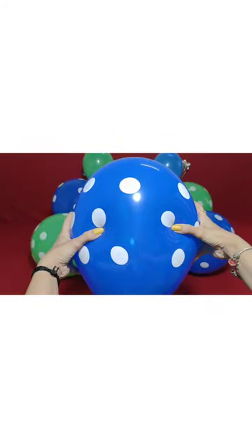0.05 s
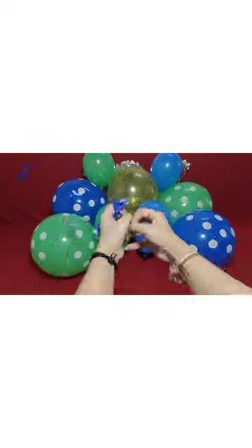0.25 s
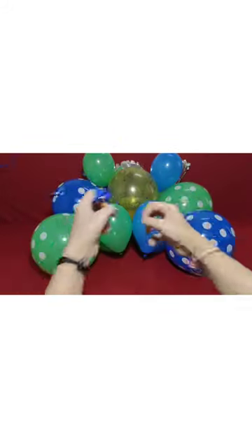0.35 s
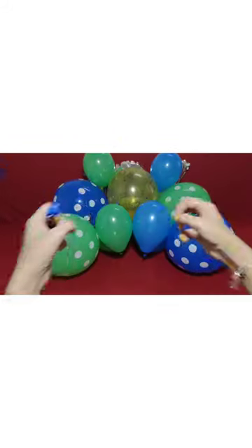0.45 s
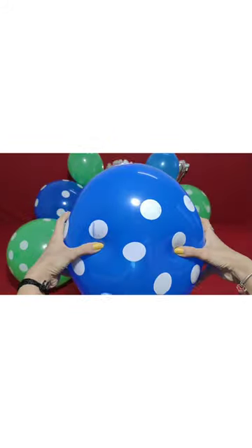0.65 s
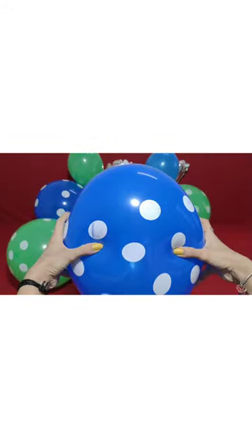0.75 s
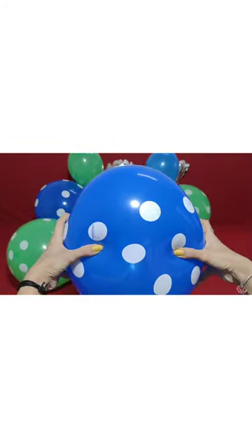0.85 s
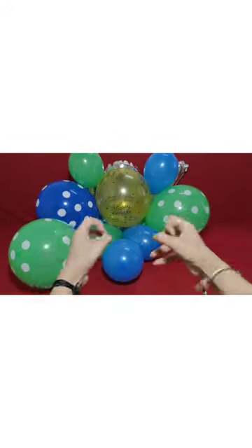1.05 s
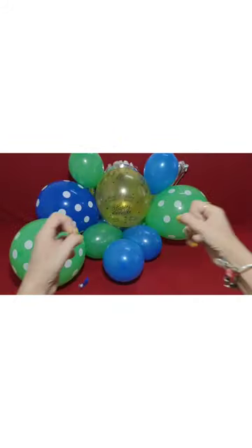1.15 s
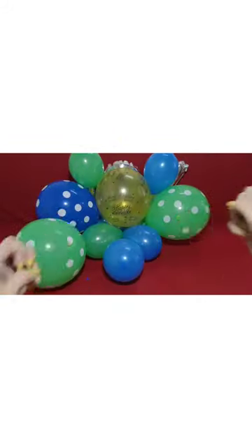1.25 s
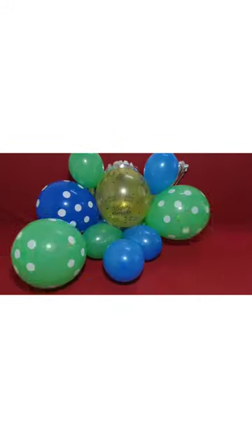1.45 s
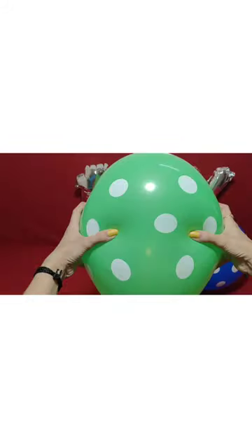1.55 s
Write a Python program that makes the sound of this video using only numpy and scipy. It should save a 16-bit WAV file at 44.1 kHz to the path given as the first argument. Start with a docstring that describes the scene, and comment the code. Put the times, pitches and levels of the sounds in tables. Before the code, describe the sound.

Two balloons pop loudly, less than a second apart, each bang ringing briefly in a small room. Fingers creak on the taut rubber before each pop and once more at the end, all close to the microphone.

```python
"""Short rubbery creaks as fingers slip on a taut balloon, close up in a small, live room.
Two large balloons are squeezed until they burst, one after the other: each bang is a pressure pulse
and a crack of tearing latex, then the room rings. A limiter clamps on each bang and lets go a tenth
of a second later, so the reverberation swells back up. The level dips briefly between the balloons."""
import sys
import numpy as np
from scipy import signal
from scipy.fft import rfft, irfft
from scipy.io import wavfile
from scipy.ndimage import uniform_filter1d

SR = 44100
rng = np.random.default_rng(int(sys.argv[2]) if len(sys.argv) > 2 else 0)


def generate_wav(signal):
    """Clip the signal to [-1, 1] and save it as 16-bit WAV at the path in sys.argv[1]."""
    frames = np.transpose(np.atleast_2d(signal))
    scaled = np.clip(frames, -1, 1) * 32767
    pcm = np.round(scaled).astype(np.int16)
    wavfile.write(sys.argv[1], SR, pcm)


N = 70560
T = np.arange(N) / SR
BIN_HZ = np.arange(N // 2 + 1) * SR / N


def from_db(db):
    """Decibels to gain."""
    return 10 ** (np.asarray(db) / 20)


def curve(points):
    """Draws a curve across the spectrum, on a log-frequency axis."""
    hz, values = np.transpose(points)
    return np.interp(np.log(np.maximum(BIN_HZ, 1)), np.log(hz), values)


def fade(t60):
    """Exponential decay, 60 dB down after t60 seconds."""
    return from_db(-60 * T / t60)


def delayed(x, start_s):
    """Places a stereo sound on the timeline."""
    return np.pad(x, ((0, 0), (int(start_s * SR), 0)))[:, :N]


# Stereo width of the room: freq_hz, side_minus_mid_db
ROOM_WIDTH = [(40, 25), (100, -20.5), (350, -9.5), (700, -1), (1300, 1), (2800, -1), (5500, -1),
              (10000, -5.5)]
def noise(colour):
    """Coloured stereo noise with the room's width; rms 1."""
    mid, side = rfft(rng.standard_normal((2, N))) * from_db(curve(colour))
    x = irfft(mid + side * from_db(curve(ROOM_WIDTH)) * [[1], [-1]], N)
    return x / x.std()


def puff(colour, t60, rise_s):
    """A short burst of coloured noise that rises quickly and dies away."""
    envelope = fade(t60) * (1 - np.exp(-T / rise_s))
    x = noise(colour) * envelope
    return x * np.sqrt(2 * np.sum(envelope ** 2) / np.sum(x ** 2))


# Colour of the quiet room: freq_hz, level_db
ROOM_TONE_COLOUR = [(30, -14), (120, 9), (500, -6), (3000, -8), (15000, -25.5)]
def room_tone():
    """A faint, dark bed of steady noise."""
    return from_db(-65) * noise(ROOM_TONE_COLOUR)


# Decay time of the room: freq_hz, t60_s
ROOM_DECAY = [(100, 0.56), (400, 0.53), (900, 0.55), (2300, 0.53), (5000, 0.49), (9000, .47), (15000, 0.25)]
def reverb(colour, rise_s=0.001):
    """Diffuse room tail: each band dies at its own rate."""
    spectrum = rfft(noise(colour))
    centres, t60s = np.transpose(ROOM_DECAY)
    bands = [curve(np.c_[centres, row]) for row in np.eye(len(centres))]
    tail = sum(irfft(spectrum * band, N) * fade(t60) for band, t60 in zip(bands, t60s))
    return tail * (1 - np.exp(-T / rise_s))


# Standing waves of the room: pitch_hz, t60_s, first_pop_db, second_pop_db
ROOM_MODES = [(118.2, 0.44, -6.5, -3.5), (131.66, 0.53, -15.5, -15), (167.1, 0.6, -20, -18.5),
              (210, 0.29, -5.5, -6), (300.5, 0.81, -16, -27.5), (355, 0.45, -7, -10.5),
              (395.7, 0.44, -7, -9.5), (428, 0.52, -21, -6.5), (479.3, 0.47, -16, -16.5),
              (517, 0.7, -21, -18.5)]
def room_modes(balloon, build_cycles=21.7, spread_rad=0.19):
    """Standing waves build up and ring out, stirred differently from each balloon's place."""
    ringing = 0
    for hz, t60, *levels_db in ROOM_MODES:
        phase = rng.uniform(0, 2 * np.pi) + spread_rad * rng.standard_normal() * np.array([[1], [-1]])
        envelope = (1 - np.exp(-T * hz / build_cycles)) * fade(t60)
        ringing += from_db(levels_db[balloon]) * np.sin(2 * np.pi * hz * T + phase) * envelope
    return ringing


def ring(hz, t60, right_lag_s=0.0001):
    """A dying swing of a balloon's air or skin, reaching the right channel just after the left."""
    swing = np.sin(2 * np.pi * hz * T) * fade(t60)
    return np.array([swing, np.interp(T - right_lag_s, T, swing)])


def radiated(x, cutoff_hz=143):
    """A balloon is too small to send out deep bass."""
    return signal.sosfilt(signal.butter(2, cutoff_hz, "high", fs=SR, output="sos"), x + 1e-18)


# Resonances of the taut skin: pitch_hz, t60_s, level_db
SKIN_MODES = [(513, 0.01, -3), (1372, 0.03, -11.5)]
# Body of a slip: freq_hz, level_db
SLIP_COLOUR = [(40, -30.5), (110, -6.5), (250, -3.5), (430, 2), (800, -3), (1100, -2.5), (1480, -5),
               (2300, -8.5), (4000, -16), (6500, -22.5), (9500, -24.5), (12000, -31.5), (15000, -53)]
# Bright edge of a slip: freq_hz, level_db
TICK_COLOUR = [(300, -9), (1200, 1), (3000, 1), (6000, -12), (10000, -12), (12500, -26), (15500, -38)]
def finger_slip(scatter_octaves=0.21):
    """The rubber lets go with a snap and a tick, knocking the skin at a new pitch each time."""
    detune = 2 ** (scatter_octaves * rng.standard_normal())
    knock = sum(from_db(db) * ring(hz * detune, t60) for hz, t60, db in SKIN_MODES)
    snap = from_db(-6) * puff(SLIP_COLOUR, t60=0.027, rise_s=0.00068)
    tick = from_db(-3) * puff(TICK_COLOUR, t60=0.0038, rise_s=0.0001)
    return knock + snap + tick


# Finger slips on the rubber: start_s, level_db
SLIP_CUES = [(0.001, -26.5), (0.0505, -20.5), (0.066, -24), (0.677, -34.5), (0.704, -29.5), (0.709, -24),
             (0.7845, -30), (0.7877, -20.5), (0.7964, -25.5), (0.803, -28), (0.8192, -25), (0.862, -35),
             (0.8873, -23), (0.920, -23.5), (0.955, -23.5), (0.973, -32), (1.008, -21.5), (1.543, -40.5),
             (1.576, -22), (1.583, -20)]
# Fine creaking under the grip: start_s, end_s, level_db
GRIP_CUES = [(0.0, 0.05, -38), (0.78, 1.0, -52), (1.55, 1.6, -32)]
def rubbing(creaks_per_s=68):
    """Stick and slip: close slips feed the room, and finer creaks sound through the room alone."""
    direct, room_send = 0, np.zeros(N)
    for start_s, db in SLIP_CUES:
        direct += from_db(db) * delayed(finger_slip(), start_s)
        room_send[int(start_s * SR)] += from_db(db)
    creaks = (rng.random(N) < creaks_per_s / SR) * rng.standard_normal(N)
    for start_s, end_s, db in GRIP_CUES:
        room_send += creaks * from_db(db) * (T > start_s) * (T < end_s)
    room = from_db(-15) * (reverb(SLIP_COLOUR) + from_db(-31) * room_modes(balloon=0))
    return radiated(direct) + signal.fftconvolve(room_send[None], room, axes=1)[:, :N]


# Colour of tearing latex: freq_hz, level_db
CRACK_COLOUR = [(40, -15), (150, -10.5), (450, -0.5), (800, -3.5), (1150, 2), (1700, 3), (2300, 4.5),
                (3800, -6), (6000, -6), (8600, -4.5), (13000, -14), (16000, -44)]
# Colour of a bang's reverb tail: freq_hz, level_db
TAIL_COLOUR = [(40, -40), (85, -25.5), (120, -9.5), (190, -10), (250, -10.5), (400, -0.5), (560, -10),
               (900, -15), (1600, -11.5), (2300, -6.5), (3100, -13.5), (5500, -17), (9000, -20),
               (12500, -23), (15500, -33)]
# The two bangs: start_s, pulse_db, pulse_hz, crack_db, flutter_db, room_db, left_minus_right_db
POP_CUES = [(0.2070, 28.5, 590, 22.5, 16, 3.5, 1.0), (1.0292, 25, 475, 21, 23.5, 2.5, .5)]
def pop(balloon):
    """The freed air swings, the latex cracks and flutters as it snaps back, and the room answers."""
    start_s, pulse_db, pulse_hz, crack_db, flutter_db, room_db, pan_db = POP_CUES[balloon]
    pulse = from_db(pulse_db) * radiated(ring(pulse_hz, t60=0.0078))
    crack = from_db(crack_db) * puff(CRACK_COLOUR, t60=0.036, rise_s=0.0007)
    flutter = from_db(flutter_db) * ring(hz=2394, t60=0.006)
    room = from_db(room_db) * (reverb(TAIL_COLOUR) + room_modes(balloon))
    pan = from_db([[pan_db / 2], [-pan_db / 2]])
    return delayed(pulse + crack + flutter + room, start_s) * pan


def scene():
    """Rubbing and two bangs over room tone; the first tail ends at a brief dip in level."""
    dip_start_s, dip_end_s = 0.658, 0.674
    dip = np.where((T > dip_start_s) & (T < dip_end_s), from_db(-25), 1)
    mix = pop(balloon=0) * (T < dip_start_s) + pop(balloon=1) + rubbing() + room_tone()
    return mix * uniform_filter1d(dip, size=64)


THRESHOLD_DB, RELEASE_DB_PER_S, CLAMP_DB = 5, 50.5, -13
DETECTOR_S, LOOKAHEAD_S, GAIN_SMOOTH_S = 0.0087, 0.0043, 0.0052
def limiter(x):
    """Looks ahead, ducks at once and recovers slowly; overload also trips a deeper clamp, twice."""
    power = uniform_filter1d(np.mean(x ** 2, axis=0), int(DETECTOR_S * SR))
    level_db = 10 * np.log10(np.abs(power) + 1e-12)
    over_db = np.interp(T + LOOKAHEAD_S, T, np.maximum(level_db - THRESHOLD_DB, 0))
    recovery_db = RELEASE_DB_PER_S * T
    gain_db = recovery_db - np.maximum.accumulate(over_db + recovery_db)
    free_s = 0
    for hold_s in (0.099, 0.110):
        trip_s = T[np.argmax((over_db > 0) & (T > free_s))]
        free_s = trip_s + hold_s
        gain_db += CLAMP_DB * (T >= trip_s) * (T < free_s)
    return x * from_db(uniform_filter1d(gain_db, int(GAIN_SMOOTH_S * SR)))


def record(dry):
    """Limits, rounds the peaks, then trims the deep bass and the very top."""
    ceiling, low_cut_hz, high_cut_hz = 1.09, 26, 17000
    rounded = ceiling * np.tanh(limiter(dry) / ceiling)
    trimmed = signal.sosfilt(signal.butter(2, low_cut_hz, "high", fs=SR, output="sos"), rounded)
    return signal.sosfilt(signal.cheby2(12, 60, high_cut_hz, fs=SR, output="sos"), trimmed)


dry = scene()
out = record(dry)
generate_wav(out)
```